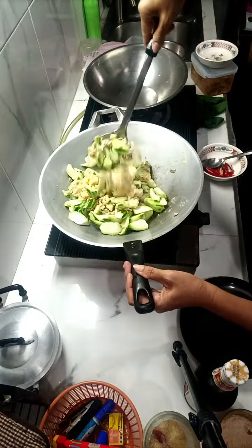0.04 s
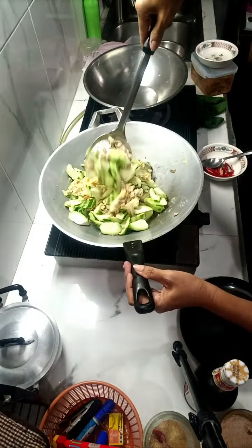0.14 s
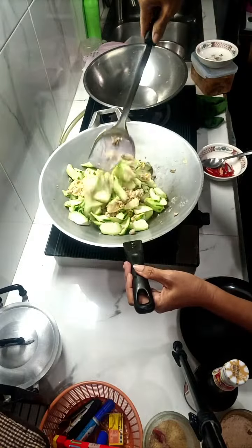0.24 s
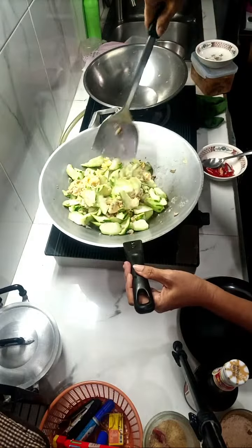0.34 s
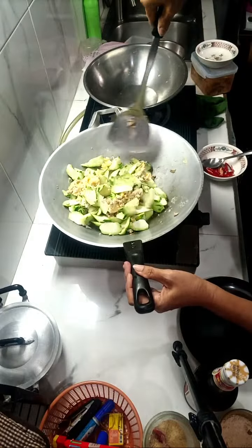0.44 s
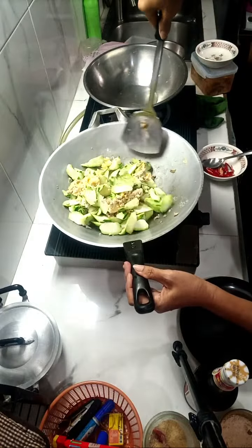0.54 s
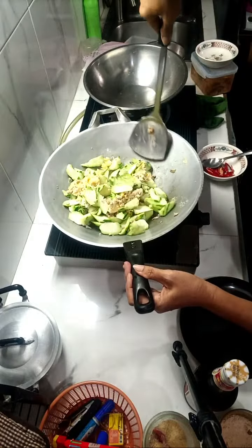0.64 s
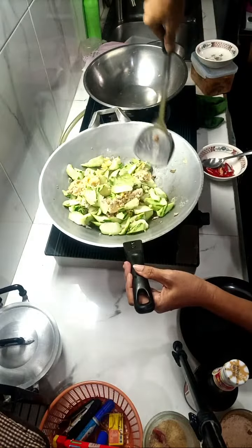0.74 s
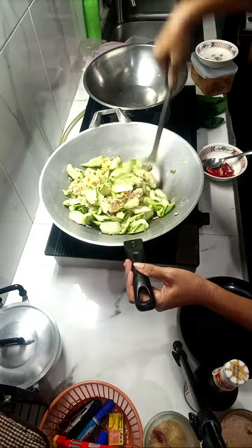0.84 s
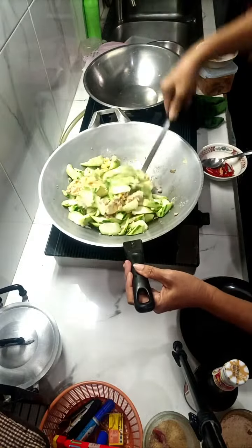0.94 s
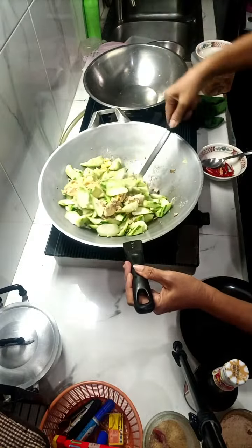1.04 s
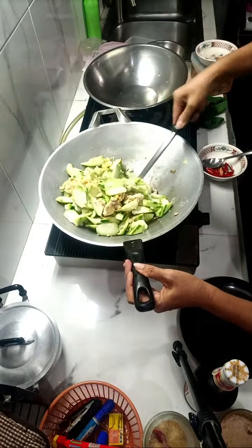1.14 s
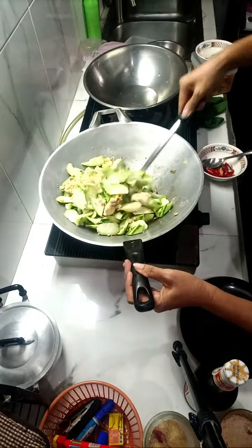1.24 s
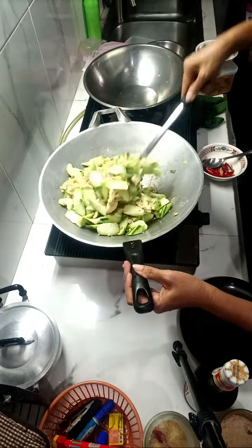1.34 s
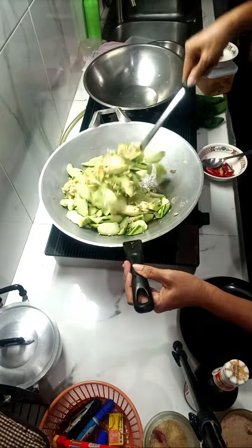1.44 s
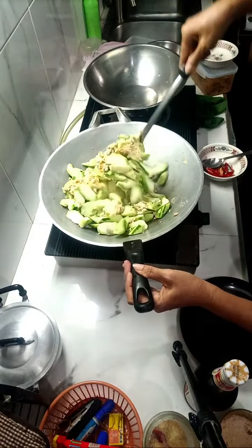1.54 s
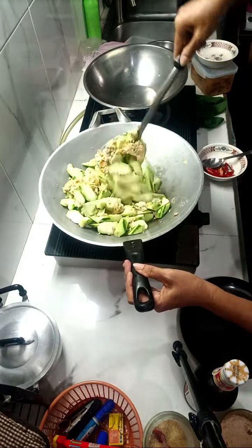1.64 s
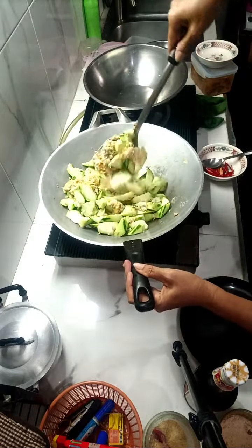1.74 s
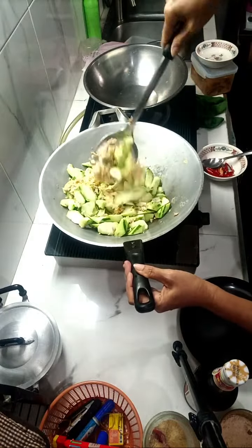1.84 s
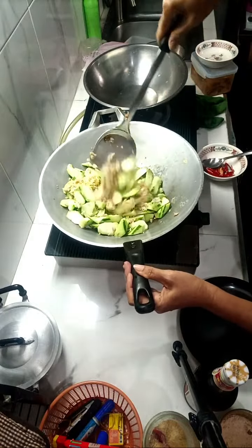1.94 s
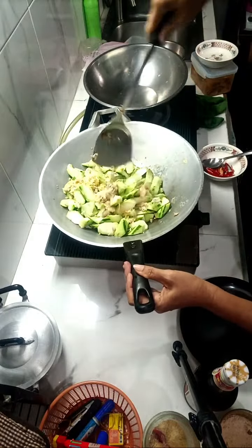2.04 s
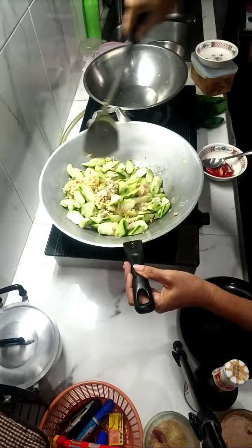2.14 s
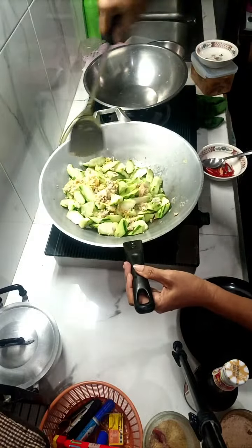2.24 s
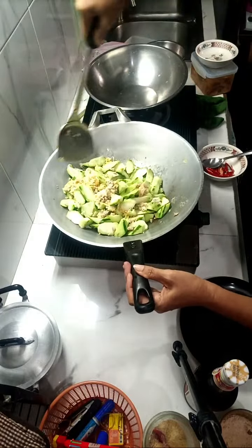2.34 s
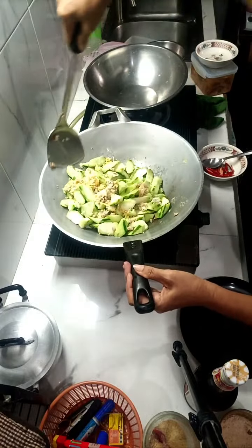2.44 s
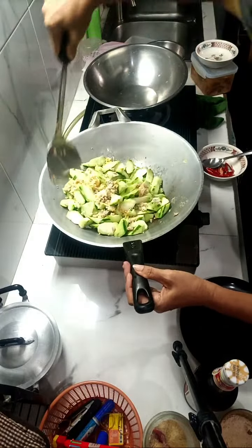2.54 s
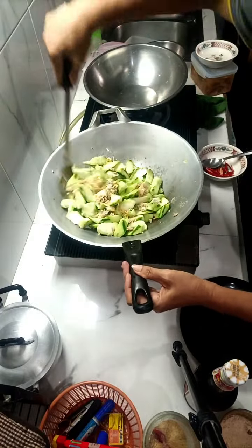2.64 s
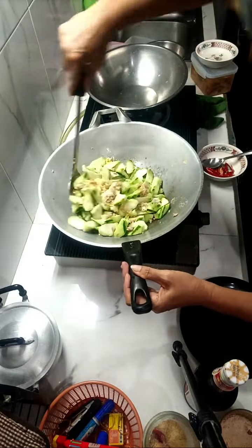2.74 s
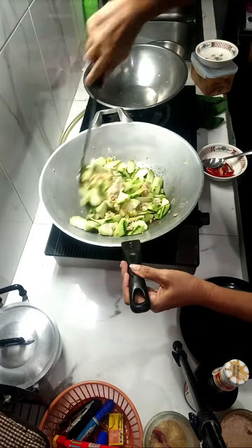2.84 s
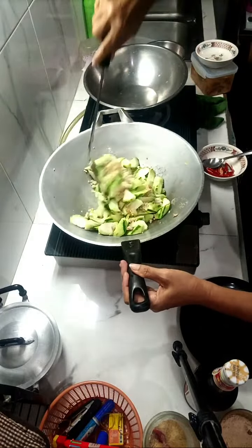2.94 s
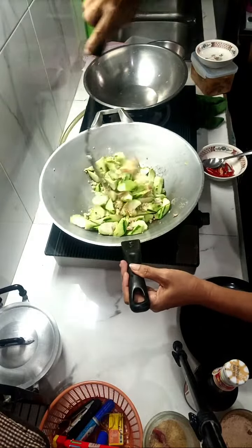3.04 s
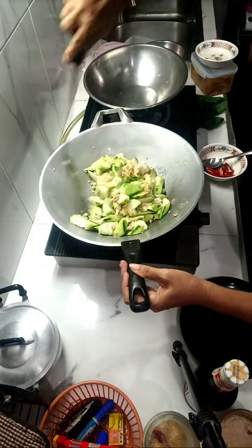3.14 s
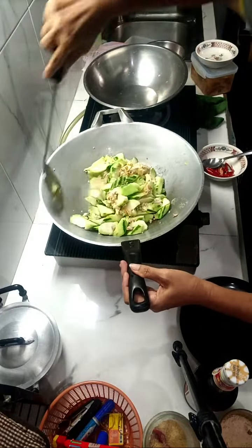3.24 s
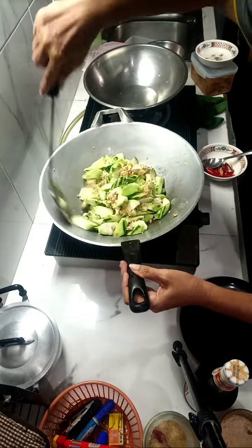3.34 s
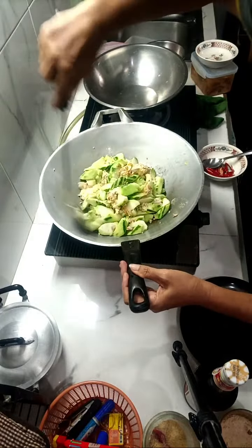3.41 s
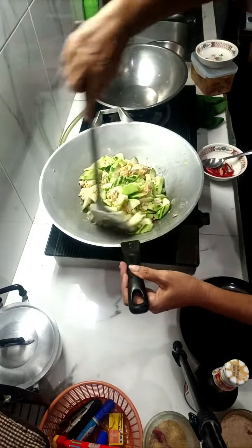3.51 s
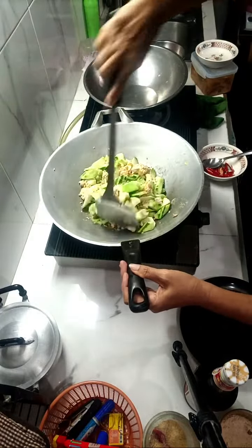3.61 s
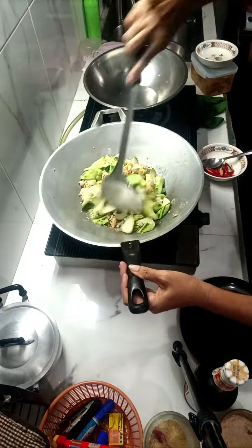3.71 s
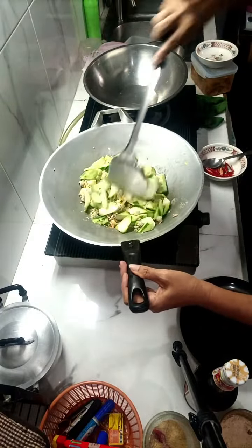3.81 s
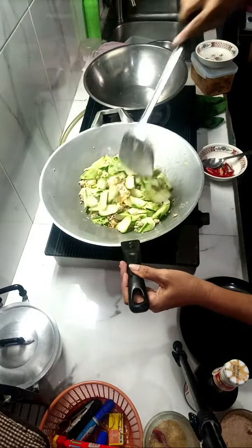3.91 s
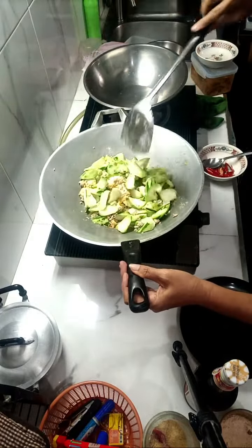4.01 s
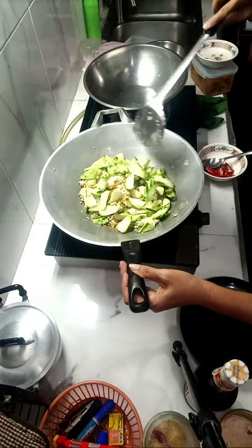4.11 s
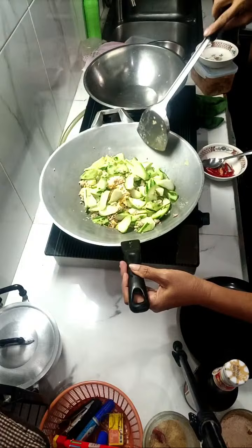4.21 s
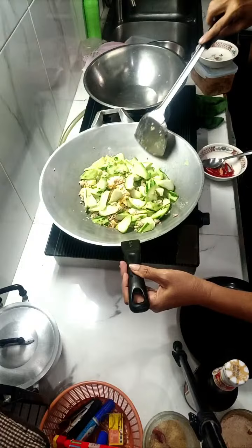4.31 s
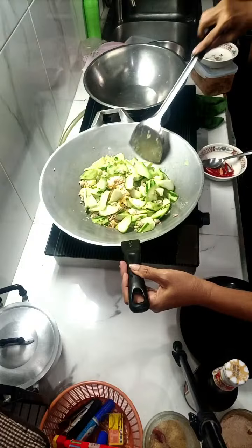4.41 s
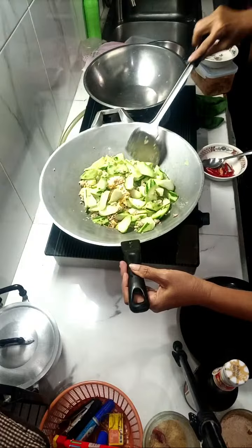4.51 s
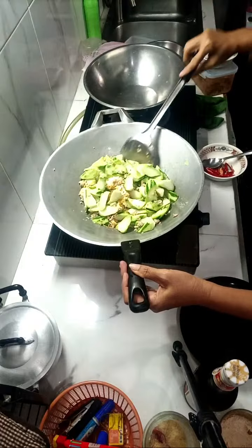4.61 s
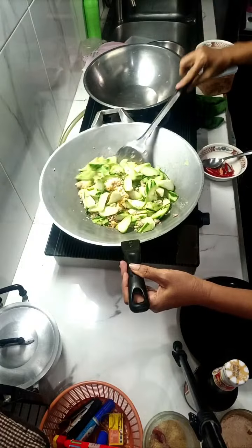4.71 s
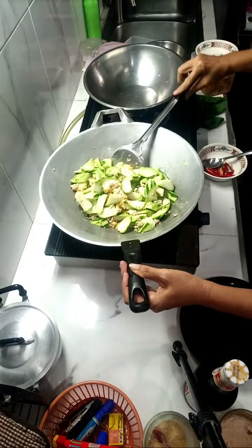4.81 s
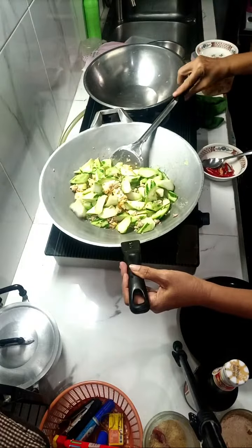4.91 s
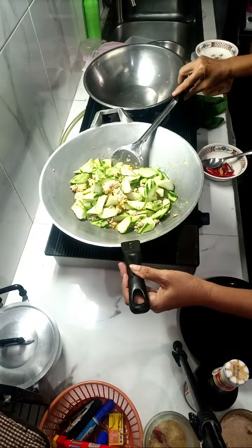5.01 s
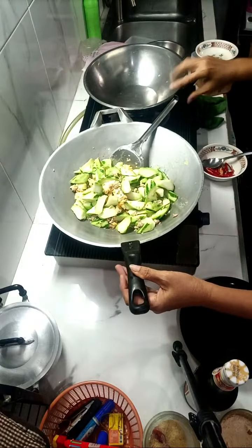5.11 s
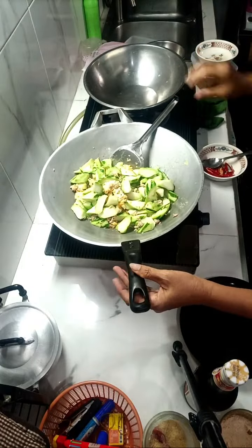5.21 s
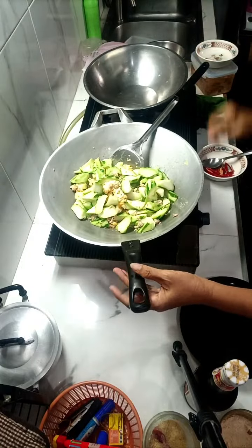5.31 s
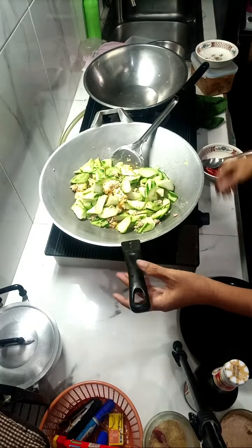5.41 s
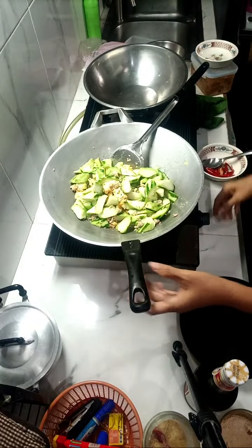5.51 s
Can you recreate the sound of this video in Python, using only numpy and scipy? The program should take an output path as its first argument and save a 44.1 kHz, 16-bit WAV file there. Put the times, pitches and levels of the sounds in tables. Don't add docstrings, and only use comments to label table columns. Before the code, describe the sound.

Uneven stir-frying: sharp steel clanks, short ringing scrapes and dull pan knocks, separated by quieter moments of faint sizzle and low burner hum.

```python
import sys
import numpy as np
from scipy import signal
from scipy.fft import rfft, irfft, next_fast_len
from scipy.io import wavfile

SR = 44100
rng = np.random.default_rng(int(sys.argv[2]) if len(sys.argv) > 2 else 0)


def wav_out(sig):
    wavfile.write(sys.argv[1], SR, np.round(np.clip(np.atleast_2d(sig).T, -1, 1) * 32767).astype(np.int16))


def decibels_to_gain(level_db):
    exponent = np.asarray(level_db, float) / 20
    return 10 ** exponent


N = 245318

# (frequency [Hz], density [dB per Hz])
SIZZLE = [(7850, -24.5), (8100, -12.5), (9100, -5), (9500, -4.5), (9900, -4), (10400, -6.5), (11100, -3.5),
          (11600, 1), (12000, -1), (16000, -4)]
# (frequency [Hz], level [dB], t60 [s])
BOWL = [(236, -15, .15), (261.8, 0, 0.41), (283, 4.5, 0.18), (337, 4, .2), (398, -1, 0.13), (458, -2, 0.21),
        (481.5, 5, 0.094), (525, -7.5, 0.16), (566.6, 0.5, 0.18), (601.5, 1.5, 0.33), (648, 6, .15),
        (672.1, 4.5, 0.22), (720.3, -0.5, 0.27), (775, -23, .12)]
# (frequency [Hz], level [dB], t60 [s])
WALL = [(915, -6, .3), (950, -12, .2), (1071, -10, .25), (1140, -3, .25), (1160, -1, .35), (1215, -12, .15),
        (1390, -10, .2), (1660, -11, .12), (1822, -12, .35), (1970, -10, .15), (2090, -9, .15),
        (2130, -7, .2), (2165, -9, .2), (2266, -6, .2), (2300, -10, .25), (2500, -20, .12),
        (2690, -22, .15), (2860, -17, .2), (3000, -15, .15), (3160, -12, .2), (3265, -11, .2),
        (3400, -8, .12), (3454, -8, .2), (3600, -13, .08), (3800, -13, .12), (3970, -14, .1),
        (4220, -15, .12), (4470, -14, .1), (4700, -17, .08)]
FAMILY_TOP_HZ = [1500, 2650]
# (time [s], knock peak [dB], favoured pitch [Hz], grind level [dB], grind fade [dB/s])
JOLTS = [(0.001, -38, 714, -46.5, 127), (0.78, -22, 457, -26.5, 8), (0.98, -20, 400, -28, 43),
         (1.007, -21.5, 640, -27.5, 121), (1.138, -30, 447, -21.5, 125), (1.289, -24, 483, -37, 225),
         (1.496, -33, 450, -36, 120), (1.529, -26.5, 447, -46, 132), (1.851, -37, 504, -44, 148),
         (1.915, -46, 733, -36, 252), (2.464, -57, 560, -29.5, 44), (2.674, -44, 750, -45, 206),
         (2.906, -32.5, 600, -34, 134), (3.282, -44, 396, -28.5, 77), (3.467, -18.5, 470, -23, 76),
         (3.716, -35, 465, -33.5, 397), (3.865, -45, 586, -32, 192), (4.014, -48, 646, -37, 203),
         (4.27, -41, 670, -27, 338), (4.462, -15, 388, -24.5, 78), (4.936, -22, 493, -41.5, 136),
         (5.101, -33.5, 497, -44, 200), (5.19, -28, 430, -32, 78), (5.256, -30, 534, -32.5, 186)]


def rms_one(x):
    return x / np.sqrt(np.mean(x ** 2) + 1e-20)


def band(x, low_hz, high_hz, order):
    return signal.sosfilt(signal.butter(order, [low_hz, high_hz], "band", fs=SR, output="sos"), x)


def coloured(x, spectrum, low_hz=20, high_hz=20000):
    size = next_fast_len(len(x))
    hz = np.maximum(np.fft.rfftfreq(size, 1 / SR), 1)
    point_hz, point_db = np.transpose(spectrum)
    gain = decibels_to_gain(np.interp(np.log(hz), np.log(point_hz), point_db))
    gain = gain * (hz > low_hz) * (hz < high_hz)
    return rms_one(irfft(rfft(x, size) * gain, size)[:len(x)])


def drift(rate_hz):
    r = np.exp(-80 * np.pi * rate_hz / SR)
    slow = signal.lfilter([1], [1, -2 * r, r * r], rng.standard_normal(N // 40 + 2002))[2000:]
    return np.interp(np.arange(N) / 40, np.arange(len(slow)), rms_one(slow))


def grit(per_s, spread_db):
    sizes = decibels_to_gain(spread_db * np.minimum(rng.exponential(1, N), 4)) * rng.choice([-1, 1], N)
    return rms_one(sizes * (rng.random(N) < per_s / SR))


def ring(drive, hz, t60_s):
    r, w = decibels_to_gain(-60 / (t60_s * SR)), 2 * np.pi * hz / SR
    return signal.lfilter([0, np.sin(w)], [1, -2 * r * np.cos(w), r * r], drive + 1e-18)


def strike(start_s, modes, gains, rise_s, hold_s):
    i = round(start_s * SR)
    t = np.arange(min(int(min(.4, 3 * hold_s) * SR), N - i)) / SR
    hz, db, t60_s = np.transpose(modes)[:, :, None]
    rings = gains[:, None] * decibels_to_gain(db - 60 * t / t60_s) * np.sin(2 * np.pi * hz * t)
    shape = (1 - np.exp(-t / rise_s)) / (1 + (t / hold_s) ** 8)
    return np.pad(rings.sum(axis=0) * shape, (i, N - i - len(t)))


def efforts(start_s, length_s, db, fade_db_per_s, attack_s, release_db_per_s):
    t = np.arange(0, N + 32, 32) / SR - start_s[:, None]
    held = np.clip(t, 0, length_s[:, None])
    level_db = db[:, None] - fade_db_per_s[:, None] * held
    level_db = level_db - release_db_per_s * np.maximum(t - held, 0)
    return (decibels_to_gain(level_db) * np.clip(t / attack_s, 0, 1)) ** 2


def per_sample(coarse):
    return np.interp(np.arange(N) / 32, np.arange(len(coarse)), coarse)


def ambience():
    # (frequency [Hz], density [dB per Hz])
    hum = [(15, -51), (25, -24.5), (111, 3), (152, -4), (185, -8.5), (483, -7), (821, -14.5), (926, -5.5),
           (1330, -9.5), (1570, -13), (3660, -18.5), (7170, -36.5), (7900, -36.5), (10300, -68.5),
           (17400, -120)]
    whole = decibels_to_gain(-60.5) * coloured(rng.standard_normal(N), hum, high_hz=8020)
    whole = whole + decibels_to_gain(-65.5) * coloured(rng.standard_normal(N), SIZZLE, low_hz=7710)
    size = next_fast_len(N)
    hz, lines, out = np.fft.rfftfreq(size, 1 / SR), rfft(whole, size), 0
    edges_hz = [0, 200, 500, 1000, 2000, 4000, 8000, 8600, 9300, 10100, 10700, 11300, 23000]
    flicker_db = [2.1, 1.7, 1.3, 1.2, 1.5, 1.1, .8, 1.6, 1.4, 1.8, 1.8, .5]
    for low, high, db in zip(edges_hz, edges_hz[1:], flicker_db):
        out = out + decibels_to_gain(db * drift(13.0)) * irfft(lines * (hz >= low) * (hz < high), size)[:N]
    return out


def flares():
    # (time [s], length [s], level [dB], easing [dB/s])
    flare_rows = [
        (0.639, 0.12, -66.5, -170),
        (1.163, 0.13, -57.5, 8),
        (2.267, 0.77, -62.5, 11),
        (2.589, 0.064, -51.5, 0),
        (3.433, 0.12, -57, 49),
    ]
    start_s, length_s, db, ease = np.transpose(flare_rows)
    power = efforts(start_s, length_s, db, ease, attack_s=0.02, release_db_per_s=400)
    return per_sample(np.sqrt(power.sum(axis=0))) * coloured(grit(9000, spread_db=1.0), SIZZLE)


def squeaks():
    # (time [s], length [s], pitch [Hz], width [Hz], level [dB])
    squeak_rows = [
        (.05, .25, 2150, 400, -70),
        (.42, .05, 2620, 100, -70),
        (.47, .16, 2100, 260, -68),
        (3.15, .09, 1250, 500, -62),
        (1.55, .05, 3450, 50, -63),
        (1.175, .035, 3300, 1800, -56),
        (3.82, .08, 3500, 300, -70),
        (4.05, .06, 3550, 300, -70),
        (3.44, .05, 4300, 1700, -54),
        (2.6, .09, 4700, 1100, -57),
    ]
    t, out = np.arange(N) / SR, 0
    for start_s, length_s, hz, width_hz, db in squeak_rows:
        rise = (t - start_s) / 0.005
        fall = (start_s + length_s - t) / 0.024 + 0.32
        shape = np.clip(np.minimum(rise, fall), 0, 1) ** 2
        noise = band(rng.standard_normal(N), hz - width_hz / 2, hz + width_hz / 2, order=3)
        out = out + decibels_to_gain(db) * shape * rms_one(noise)
    return out


def grinding():
    start_s, _, _, grind_db, fade = np.transpose(JOLTS)
    length_s = np.full(len(start_s), 0.14)
    return efforts(start_s, length_s, grind_db, fade, attack_s=0.0079, release_db_per_s=147) + 1e-20


def stand():
    thrum = rms_one(band(rng.standard_normal(N), 105, 180, order=3))
    return decibels_to_gain(-33) * per_sample(np.sqrt(grinding().sum(axis=0))) * thrum


def rumble():
    power, jolt_hz = grinding(), np.array(JOLTS)[:, 2]
    total = power.sum(axis=0)
    level, pitch_hz = per_sample(np.sqrt(total)), jolt_hz @ power / total
    slips, out = band(grit(800, spread_db=2.5), 180, 800, order=2), 0
    for hz, db, t60_s in BOWL:
        near_db = per_sample(-12 * np.abs(np.log2(hz / pitch_hz)))
        gain = decibels_to_gain(db + near_db + 3.9 * np.tanh(drift(5.1)))
        out = out + gain * rms_one(ring(slips, hz, 0.32 * t60_s))
    return level * decibels_to_gain(-9.0) * (out / 2.88 + decibels_to_gain(-20.0) * rms_one(slips))


def knocks():
    # (time [s], peak [dB], favoured pitch [Hz])
    rebounds = [(0.987, -24, 393), (0.834, -16, 450), (0.859, -32, 640), (1.18, -32, 422),
                (1.239, -41, 730), (1.339, -35, 620), (1.559, -49, 455), (2.702, -44, 730),
                (2.833, -33.5, 466), (3.368, -19.5, 520), (3.529, -29, 660), (3.564, -37, 670),
                (3.595, -17, 408), (3.759, -47, 650), (4.489, -15, 396), (5.209, -35, 516),
                (5.284, -37, 594), (5.329, -41.5, 630)]
    blows = [tuple(row[:3]) for row in JOLTS] + [tuple(row) for row in rebounds]
    out, luck = 0, rng.normal(0, 1, (len(blows), len(BOWL)))
    modes = np.array(BOWL) * [1, 1, 0.14 / 0.21]
    for (start_s, peak_db, pitch_hz), spot in zip(blows, luck):
        near_db = -22 * np.abs(np.log2(modes[:, 0] / pitch_hz))
        gains = decibels_to_gain(peak_db - 9.0 + near_db + 4.3 * spot)
        out = out + strike(start_s, modes, gains, rise_s=0.0035, hold_s=0.095)
    return out


def bowl():
    return band(knocks() + rumble(), 234, 935, order=4)


def thuds():
    # (time [s], pitch [Hz], held
    # [s], level [dB])
    thud_rows = [(.776, 459, .022, -17.5), (.78, 245, 0.032, -25.5), (.80, 323, 0.09, -25.5),
                 (.83, 489, 0.04, -24.5), (.845, 617, 0.031, -23.5), (.86, 748, 0.032, -32),
                 (.983, 403, 0.038, -20.5), (1.005, 707, 0.042, -24.5), (1.02, 616, 0.032, -20.5),
                 (1.05, 603, 0.039, -31), (1.05, 741, 0.048, -32), (1.138, 430, 0.018, -19),
                 (1.14, 705, .025, -26), (1.145, 328, 0.019, -24), (1.18, 730, 0.022, -30),
                 (1.18, 587, 0.015, -27.5), (1.175, 377.5, 0.036, -29), (1.22, 721, 0.031, -35),
                 (1.24, 306, .04, -39), (1.287, 469, 0.018, -25.5), (1.298, 621, 0.051, -32.5),
                 (3.465, 454, 0.026, -20.5), (3.475, 646, 0.028, -27), (3.485, 242, 0.038, -31),
                 (3.515, 455, .035, -31), (3.51, 659.3, 0.05, -29), (3.59, 453, 0.011, -28),
                 (3.59, 339.4, .03, -27.5), (3.615, 711, 0.027, -35.5), (3.56, 747, 0.016, -36),
                 (4.462, 397.7, 0.12, -21), (4.47, 719, 0.046, -23.5), (4.465, 597, 0.058, -25),
                 (4.465, 958, 0.023, -26), (4.55, 726, 0.025, -37), (4.998, 920, 0.036, -38.5),
                 (5.19, 390, 0.023, -36.5), (5.208, 602, 0.037, -31.5), (5.255, 644, 0.023, -31),
                 (5.28, 600, 0.054, -33.5), (5.115, 630, .05, -47), (5.328, 603, 0.022, -43),
                 (1.527, 471, 0.016, -33), (1.53, 674, .018, -39), (1.553, 462, 0.016, -33),
                  (1.575, 718, 0.029, -48), (1.615, 340, .035, -52), (1.851, 495, 0.018, -34),
                  (1.875, 647, 0.058, -42.5), (1.915, 713, 0.023, -34.5), (1.94, 714, 0.03, -44),
                  (2.466, 750, .02, -30.5), (2.54, 261.6, 0.047, -35), (2.672, 700, 0.013, -35.5),
                  (2.70, 722, 0.014, -35.5), (2.906, 627, 0.042, -31.5), (2.94, 690, 0.072, -38),
                  (3.715, 476, .016, -25.5), (3.755, 650, 0.019, -43.5), (3.864, 481, 0.022, -33),
                  (3.866, 625, 0.014, -28.5), (3.89, 600, .02, -37), (4.014, 458, .015, -35),
                  (4.016, 630, 0.019, -32.5), (4.035, 709, .018, -37.5), (4.055, 640, 0.015, -40)]
    return sum(strike(start_s, [(hz, db, 0.43)], np.ones(1), rise_s=.004, hold_s=held_s)
               for start_s, hz, held_s, db in thud_rows)


def glides():
    # (time [s], length [s], from [Hz], to [Hz], level [dB])
    glide_rows = [(0.829, 0.072, 2270, 2126, -32.5), (0.834, 0.098, 3490, 3430, -47),
                  (2.51, 0.04, 3170, 3350, -45.5), (2.591, 0.071, 3310, 3450, -48.5),
                  (2.597, 0.049, 4070, 4040, -61), (2.63, 0.094, 2254, 2210, -53.5),
                  (3.317, 0.055, 3740, 3210, -48), (3.369, 0.052, 3600, 3870, -53.5),
                  (3.464, 0.035, 4010, 3520, -42), (3.496, 0.037, 3610, 3530, -54),
                  (3.53, 0.034, 4100, 4100, -59.5), (4.278, 0.043, 3404, 3150, -40),
                  (4.383, 0.07, 3360, 3560, -50.5), (4.388, 0.055, 2870, 2930, -52),
                  (4.556, 0.075, 3480, 3970, -62), (4.625, 0.08, 3640, 3480, -60.5),
                  (4.67, 0.082, 4270, 4470, -64), (.09, 0.088, 2210, 2180, -63),
                  (.18, .065, 2030, 2180, -64), (0.522, 0.099, 2000, 2130, -61.5),
                  (4.485, 0.0536, 1310, 1168, -32.5), (2.54, 0.031, 3700, 3850, -49),
                  (2.565, 0.088, 2150, 1995, -56.5), (2.65, 0.073, 3500, 3350, -58.5),
                  (2.465, 0.03, 4000, 3800, -50), (2.462, 0.035, 2980, 2930, -41.5),
                  (3.56, 0.064, 3580, 3660, -69), (4.3, 0.028, 4480, 4620, -55),
                  (4.39, 0.052, 4720, 4450, -58), (.93, 0.057, 3700, 3860, -54),
                  (.93, 0.081, 2100, 2300, -55), (4.59, 0.033, 3450, 3420, -67)]
    width_hz, purity = 220, .5
    low_pass = signal.butter(2, width_hz / 2, fs=SR, output="sos")
    out = np.zeros(N)
    for start_s, length_s, from_hz, to_hz, db in glide_rows:
        part = np.arange(int(length_s * SR)) / (length_s * SR)
        turn = np.exp(2j * np.pi * np.cumsum(from_hz + (to_hz - from_hz) * part) / SR)
        noise = signal.sosfilt(low_pass, rng.standard_normal((2, SR // 3)))
        a, b = rms_one(noise[:, 2000:])[:, :len(part)]
        tone = rms_one((a + purity) * turn.real + b * turn.imag)
        i = round(start_s * SR)
        out[i:i + len(part)] += decibels_to_gain(db) * np.sqrt(np.sin(np.pi * part)) * tone
    return out


def sings():
    # (time [s], pitch [Hz], held [s], level [dB])
    struck = [(.752, 3454, .024, -34), (.78, 3454, .013, -16), (.794, 3454, .011, -27),
              (.783, 1152, .034, -23), (.82, 1152, .045, -25), (.885, 1152, .04, -30.5),
              (.81, 2120, .075, -30), (2.465, 1130, .14, -34.5), (2.465, 930, .1, -31),
              (3.278, 1150, .044, -22), (3.322, 1152, .08, -26.5), (3.276, 915, .035, -28),
              (3.3, 1822, .06, -40), (3.285, 334, .11, -31), (4.283, 1071, .025, -29),
              (4.52, 1165, .06, -30), (4.28, 926, .05, -32), (4.9315, 930, .024, -26),
              (4.95, 2050, .045, -44), (2.465, 250, .05, -35), (4.54, 255, .12, -37), (1.92, 238, .06, -43),
              (2.92, 240, .08, -43), (3.875, 256, .05, -48), (.81, 3420, .016, -30),
              (.779, 2290, .035, -29)]
    # (time [s], pitch [Hz], held [s], level [dB])
    rubbed = [(4.279, 1826, .097, -25.5), (1.695, 335, .07, -51), (1.77, 320, .04, -53),
              (4.39, 1152, .07, -32), (4.41, 1825, .04, -45), (4.39, 640, .06, -47),
              (4.645, 1395, .045, -43), (4.695, 1420, .04, -46), (4.655, 1140, .04, -45),
              (4.775, 1200, .035, -52), (4.71, 1120, .05, -39), (4.712, 1165, .05, -39),
              (2.7, 245, .05, -50), (4.67, 2350, .07, -56), (5.2, 255, .1, -45.5), (2.63, 1680, .1, -50),
              (2.6, 700, .07, -43)]
    out, wavers = 0, [decibels_to_gain(2 * np.tanh(drift(32))) for _ in range(4)]
    for rows, t60_s, rise_s in [(struck, .5, .002), (rubbed, 1.3, .007)]:
        for k, (start_s, hz, held_s, db) in enumerate(rows):
            tone = strike(start_s, [(hz, db, t60_s)], np.ones(1), rise_s, held_s)
            out = out + wavers[k % 4] * tone
    return out


def scrape():
    # (time [s], length [s], pressure [dB], easing [dB/s], brightness [dB per mode family])
    drags = [(2.452, 0.012, -58.5, -700, 7), (3.261, 0.013, -63, -900, -2), (4.254, 0.027, -59, -900, -3),
             (4.912, .011, -70.5, -700, 1.5), (0.704, 0.074, -65, -200, -1), (0.749, .025, -37, 400, 4.5),
             (0.777, 0.24, -31.5, 74, 1), (1.094, 0.23, -52.5, 48, -1.5), (0.988, 0.026, -38, 30, -5),
             (2.459, 0.032, -27, 300, -6), (2.507, 0.066, -37, 26, -4), (2.593, 0.14, -44, 66, -1.5),
             (3.271, 0.13, -34.5, 69, -4.5), (3.444, 0.026, -42.5, -150, -4), (3.458, 0.29, -37, 160, -4.5),
             (4.268, 0.15, -28.5, 119, -3), (4.396, 0.099, -36.5, 15, -7), (4.456, 0.051, -25, 200, -5.5),
             (4.499, 0.13, -34.5, 68, -5.5), (4.654, 0.12, -48.5, 40, -2.5),
             (4.929, 0.11, -31.5, 289, -1.5)]
    # (level [dB]), (brightness share [1]), (easing share [1])
    family_db = [7, 6.5, 2.5, -9.5]
    family_step = [0, 1.1, 1.3, 2.1]
    family_easing = [0.68, 1.01, 1.11, 1.36]
    # (frequency [Hz], level [dB], t60 [s])
    edge_modes = [(8300, -11, 0.035), (9190, -10, 0.041), (9550, -5.5, 0.031), (9900, -6, 0.037),
                  (10800, -7, 0.054), (11800, -7.5, 0.038), (13800, -17, 0.026), (14870, -37, 0.026)]
    # (frequency [Hz], density [dB per Hz])
    rasp = [(700, -15.5), (1150, -3), (1550, -9.5), (2200, -10.5), (2750, -15), (3400, -14), (3950, -14),
            (4500, -17.5), (6200, -32.5), (7900, -49)]
    start_s, length_s, press_db, ease, bright_db = np.transpose(drags)
    levels = []
    for db, step, share in zip(family_db, family_step, family_easing):
        power = efforts(start_s, length_s, press_db + db + step * bright_db, share * ease,
                        attack_s=0.0023, release_db_per_s=share * 266.5)
        levels.append(per_sample(np.sqrt(power.sum(axis=0))))
    *family, edge = levels
    catches, out = grit(5000, spread_db=1.7), 0
    for hz, db, t60_s in WALL:
        gain = decibels_to_gain(-17.0 + db + 4.5 * np.tanh(drift(14)))
        level = family[np.searchsorted(FAMILY_TOP_HZ, hz)] * gain
        out = out + level * rms_one(ring(catches, hz, t60_s))
    for hz, db, t60_s in edge_modes:
        gain = decibels_to_gain(db - 6 + 6 * np.tanh(drift(22)))
        out = out + edge * gain * rms_one(ring(catches, hz, t60_s / 2))
    edges_hz = [700, 1550, 2650, 8000]
    for low, high, level, share_db in zip(edges_hz, edges_hz[1:], family, [-13, -12, -10]):
        gain = decibels_to_gain(share_db + 2.06 * np.tanh(drift(26)))
        out = out + level * gain * coloured(catches, rasp, low, high)
    return out + edge * decibels_to_gain(-2.5) * coloured(grit(9000, spread_db=2.5), SIZZLE)


def ticks():
    # (time [s], pitch [Hz], peak [dB])
    tick_rows = [(.7777, 1150, -17), (.7817, 500, -20), (.7857, 550, -19), (.82, 1100, -24),
                 (1.141, 2300, -42), (1.1415, 600, -22), (1.1815, 600, -22), (1.183, 2750, -40),
                 (1.9155, 760, -31), (2.4685, 1000, -23), (2.483, 1000, -24), (3.2802, 1080, -13),
                 (3.2903, 1080, -16), (3.565, 750, -24), (3.4685, 650, -21), (5.192, 900, -40),
                 (4.2706, 1150, -7), (4.278, 1050, -11), (4.4645, 1900, -18), (4.4685, 2100, -20),
                 (4.4858, 600, -16), (4.499, 500, -21)]
    cycles = 3
    return sum(strike(start_s, [(hz, db, 8 * cycles / hz)], np.ones(1), rise_s=.0005, hold_s=cycles / hz)
               for start_s, hz, db in tick_rows)


def clanks():
    # (time [s], crack peak [dB], its top octave [dB], ring [dB], ring brightness [dB per mode family])
    clank_rows = [(0.751, -16, -30, -47, 16), (0.777, -3.5, -24, -23, 5), (2.462, -15.5, -63, -47, -25),
                  (2.466, -36, -45, -46, -17), (2.481, -29, -59, -21, -16), (3.275, -12.5, -26, -24, -20),
                  (3.282, -26, -38, -34, 8.5), (4.271, -10.5, -24.5, -26, 5), (4.277, -16, -52, -15, -24),
                  (4.464, -14.5, -71, -41, -3), (4.932, -16, -35, -26, 0)]
    # (frequency [Hz], density [dB per Hz])
    crack = [(290, -39.5), (500, -15.5), (1180, -4.5), (1610, -23.5), (2300, -1.5), (2670, -24.5),
             (3440, -4), (3820, -16.5), (4490, -8.5), (7900, -63), (10300, -72), (17400, -120)]
    spit_hz = [9100, 11800, 13200, 15200]
    out, luck = 0, rng.normal(0, 1, (len(clank_rows), len(WALL)))
    family = np.searchsorted(FAMILY_TOP_HZ, np.array(WALL)[:, 0])
    t = np.arange(int(.2 * SR)) / SR
    crack_shape = decibels_to_gain(-60 * t / 0.035) + decibels_to_gain(-9.0 - 60 * t / 0.21)
    spit_shape = decibels_to_gain(-60 * t / 0.057) / (1 + (t / 0.011) ** 6) + decibels_to_gain(-18.0 - 60 * t / 0.34)
    crack_env, spit_env = np.zeros(N), np.zeros(N)
    for (start_s, peak_db, top_db, ring_db, bright_db), spot in zip(clank_rows, luck):
        gains = decibels_to_gain(ring_db + bright_db * family - 13.0 + 4 * spot)
        out = out + strike(start_s, WALL, gains, rise_s=0.00039, hold_s=0.073)
        i = round(start_s * SR)
        crack_env[i:i + len(t)] += decibels_to_gain(peak_db - 19.0) * crack_shape
        spit_env[i:i + len(t)] += decibels_to_gain(top_db - 1.0) * spit_shape
    noise = rng.standard_normal(N)
    edge = rms_one(sum(rms_one(ring(noise, hz, 0.036)) for hz in spit_hz))
    spit = 0.8 * coloured(noise, SIZZLE) + decibels_to_gain(-1.5) * 0.61 * edge
    return out + crack_env * coloured(noise, crack) + spit_env * spit


def kitchen(x):
    t60_s, level_db = 0.37, -14
    t = np.arange(int(.4 * SR)) / SR
    tail = rng.standard_normal(len(t)) * decibels_to_gain(-60 * t / t60_s) * (t > .004)
    return decibels_to_gain(level_db) * signal.fftconvolve(x, tail / np.sqrt(np.sum(tail ** 2)))[:N]


def scene():
    hits = clanks() + ticks() + bowl() + thuds() + scrape()
    pan = hits + kitchen(hits) + sings() + glides()
    pan = signal.sosfilt(signal.butter(3, 150, "high", fs=SR, output="sos"), pan)
    return (pan + stand() + squeaks() + flares() + ambience())[None]


def roll_off(x):
    return signal.sosfilt(signal.butter(12, 16820, fs=SR, output="sos"), x)


def record(dry):
    top_cut = signal.ellip(9, .5, 38, 15750, fs=SR, output="sos")
    return roll_off(signal.sosfilt(top_cut, dry))


dry = scene()
out = record(dry)
wav_out(out)
```